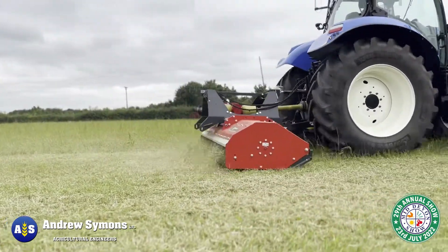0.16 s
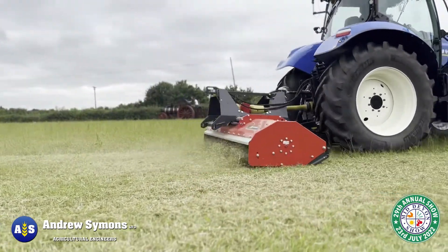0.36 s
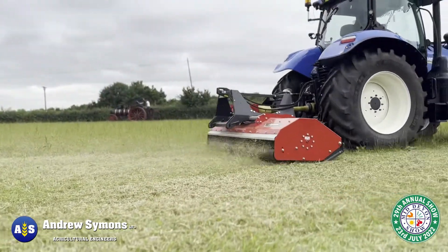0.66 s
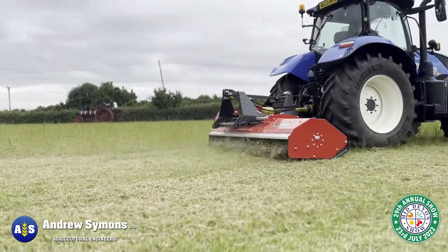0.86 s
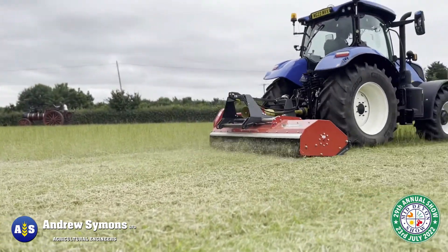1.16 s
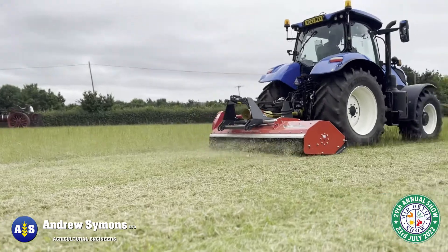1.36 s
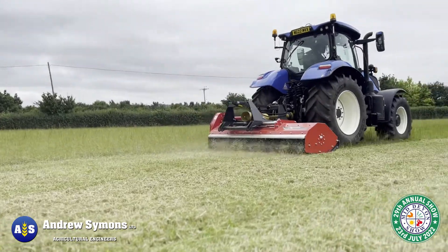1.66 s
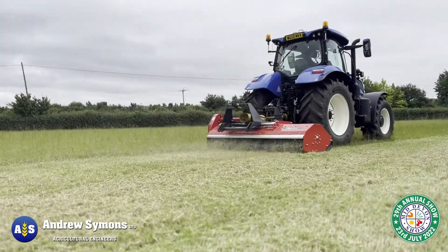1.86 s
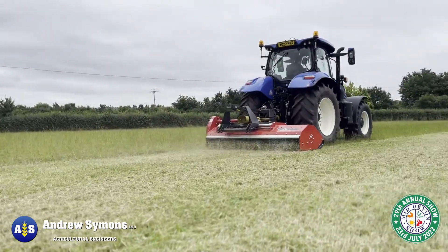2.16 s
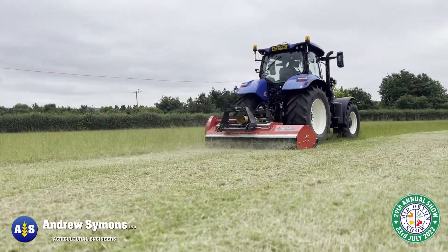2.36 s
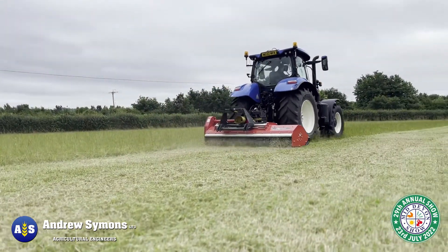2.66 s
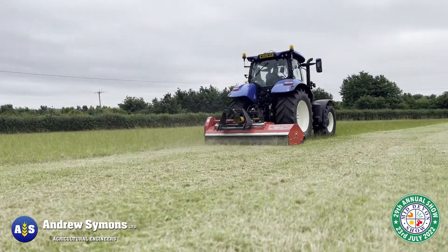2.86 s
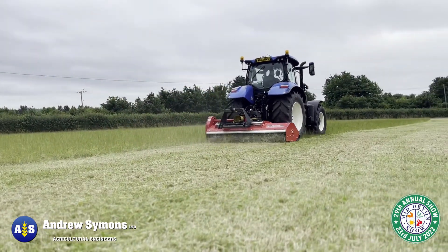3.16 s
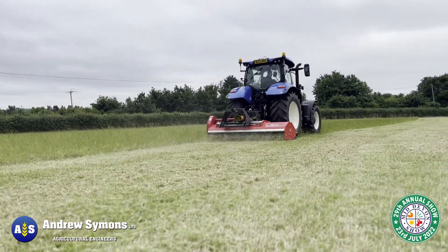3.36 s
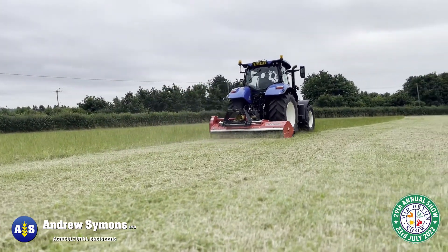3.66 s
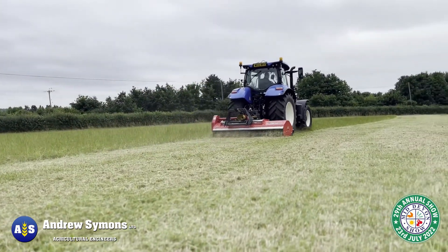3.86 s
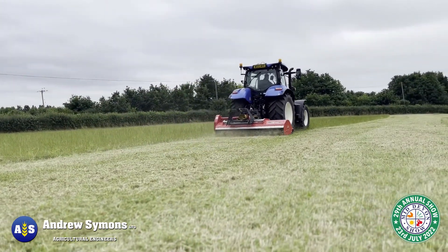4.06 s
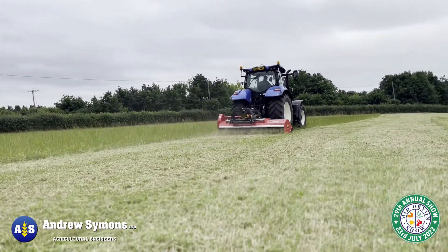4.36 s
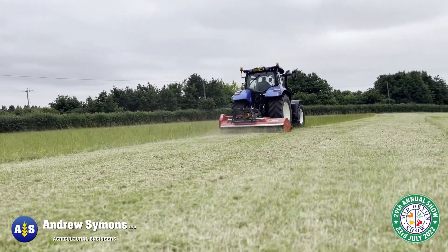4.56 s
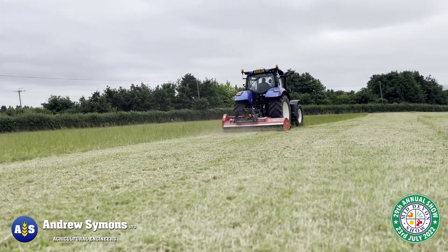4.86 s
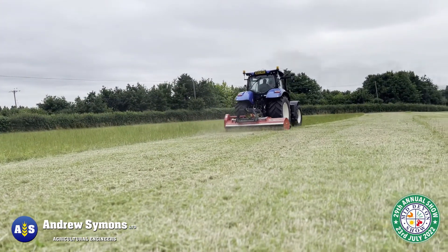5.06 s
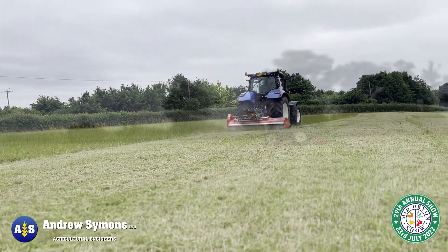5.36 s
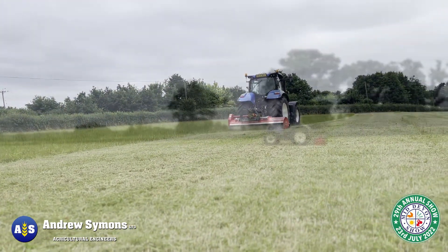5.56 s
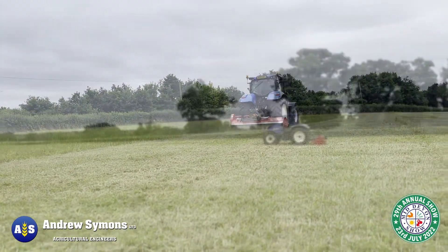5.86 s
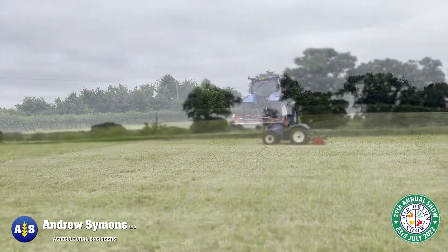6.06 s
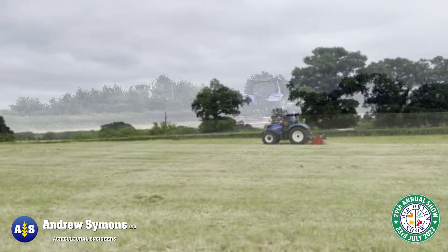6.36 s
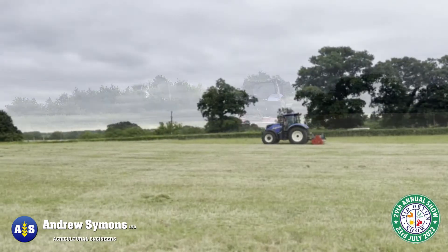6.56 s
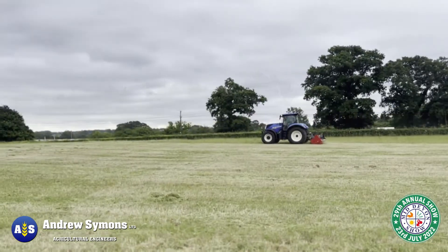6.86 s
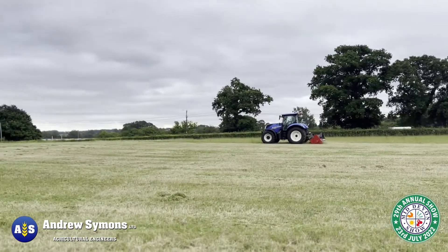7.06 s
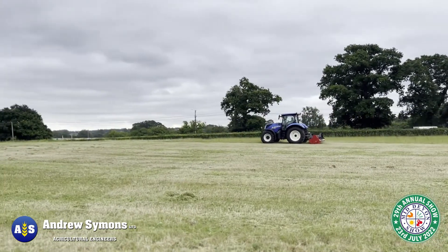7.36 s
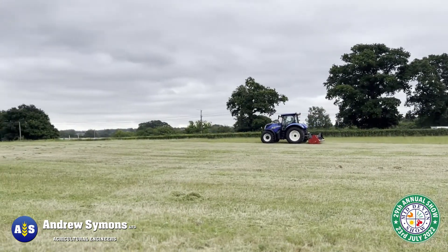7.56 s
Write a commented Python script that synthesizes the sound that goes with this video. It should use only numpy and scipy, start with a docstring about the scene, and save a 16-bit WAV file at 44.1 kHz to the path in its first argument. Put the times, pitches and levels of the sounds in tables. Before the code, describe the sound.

Outdoors in an open field, a tractor with a flail mower starts close to a phone microphone: low engine roar, steady rotor hum, bright hissing of shredded grass, knocking clatter and faint gear whine. A sharp burst of debris rattles on the steel hood just after one second. The machine draws away, wind thumps on the microphone from three seconds, and the sound crossfades into a faint, duller far-off drone with thin gear tones.

```python
"""A flail mower towed by a diesel tractor draws away over an open field, heard by a two-port phone.
The rotor hum and gear whine are wavering sines; the grass hiss, clatter and low boom are coloured noise.
Stalks and clods on the steel hood are bursts of grit noise filtered by its modes.
Wind buffets are falling flutters with low thuds. A far pass, tones and noise with a ground echo, fades in."""
import sys
import numpy as np
from scipy import signal
from scipy.fft import rfft, irfft, next_fast_len
from scipy.io import wavfile
from scipy.ndimage import uniform_filter1d

SR = 44100
rng = np.random.default_rng(int(sys.argv[2]) if len(sys.argv) > 2 else 0)


def store_wav(level_fs):
    """Save 16-bit WAV to argv[1]."""
    pcm = np.round(np.clip(np.atleast_2d(level_fs), -1, 1) * 32767)
    wavfile.write(sys.argv[1], SR, pcm.T.astype(np.int16))


N = 340432
T = np.arange(N) / SR  # s
M = next_fast_len(N)  # transform length
F = np.maximum(np.arange(M // 2 + 1) * SR / M, 1)  # Hz, kept above 0

# wind eddies bursting on the phone: [t/s, flutter peak level/dB, flutter f/Hz, thud peak level/dB]
EDDIES = [(3.11, -18.5, 328, -12), (3.21, -26, 306, -26), (3.353, -40, 290, -18), (3.378, -37, 292, -11),
          (3.758, -34, 399, -13), (3.88, -34, 374, -23), (3.99, -30, 332, -32), (4.08, -37, 399, -30),
          (4.145, -31.5, 451, -25), (4.301, -24.5, 360, -13), (4.325, -31, 419, -30),
          (4.635, -34, 374, -30), (4.79, -32, 403, -30), (4.898, -32, 403, -30), (5.385, -34, 332, -22),
          (5.41, -23, 339.5, -28), (5.424, -25.5, 398, -23), (5.471, -26, 198, -40), (5.625, -41, 194, -20),
          (5.719, -38, 303, -14), (5.9, -40, 600, -32), (5.914, -31.5, 398, -25),
          (5.983, -18.5, 231.5, -19), (6.075, -34, 397, -23), (6.379, -29, 459, -18), (6.6, -30, 308, -41),
          (6.7, -41, 395, -16.5)]
BUFFET_S = 0.0084  # time unit of a buffet


def rotor():
    """Periodic passage: rows of flails pass the hood edge at a steady rate and sound its frequency."""
    # the hum swells as the open back of the hood turns to the phone, then fades: [t/s, level/dB]
    hum_rows = [(0.0, -25), (0.43, -32), (0.7, -27), (1.1, -20.5), (1.35, -20.5), (1.7, -16), (3.0, -18),
                (4.4, -18), (4.65, -22.5), (5.14, -18.5), (5.5, -25.5), (5.75, -23), (6.6, -33.5),
                (6.9, -31), (7.16, -41), (7.42, -35.5), (7.72, -32)]
    hum_db, = curve(hum_rows)
    hz = 128.6 + 0.13 * walk(4.1)
    phase = 2 * np.pi * np.cumsum(hz) / SR
    return direct(np.sqrt(2) * undb(hum_db) * np.sin(phase))


def grass():
    """Cavity resonance: broadband noise of shredded grass rings in the hood; the treble moves on its own."""
    # course of the hiss, before the hood rings: [t/s, level/dB, level above 7.2 kHz/dB]
    grass_rows = [(0.0, -26.5, -32), (0.32, -26.5, -30), (0.72, -25.5, -26.5), (0.9, -23.5, -29),
                  (1.1, -25, -25.5), (1.4, -25.5, -27), (1.72, -24, -25.5), (2.17, -27, -25),
                  (2.48, -29, -29), (2.86, -28, -29), (3.03, -27, -24.5), (3.27, -30.5, -32),
                  (3.75, -28.5, -28), (4.1, -30.5, -30.5), (4.4, -31, -34), (5.14, -31, -32.5),
                  (5.59, -35, -35.5), (6.0, -39.5, -41), (6.45, -41.5, -45.5), (6.65, -47.5, -52.5),
                  (7.25, -46, -54.5), (7.42, -41, -47), (7.72, -42.5, -45)]
    # spectrum of the shredding: [f/Hz, density/dB per Hz]
    hiss_colour = [(1200, -7), (2000, -4.5), (2900, -1), (3700, -1.5), (4900, -6.5), (6500, -1), (8500, -3),
                   (12500, -1), (16000, -4)]
    # resonances of the hood cavity: [f/Hz, width/Hz, level/dB]
    cavity = [(1970, 950, -6), (2340, 47, -7), (2810, 43, 3), (3590, 36, -4), (4120, 220, -3),
              (4650, 68, 0.5), (5020, 100, -1.5)]
    # thick tufts lift the hiss for a moment: [t/s, lift/dB, decay/s]
    tufts = [(0.09, 5, 0.033), (1.04, 3, .03), (1.2, 4.5, 0.074), (1.99, 5.5, 0.065), (2.06, 2, 0.073),
             (2.21, 3, .06), (2.485, 6.5, 0.044), (3.55, 2.5, 0.023), (3.65, 4.5, 0.025), (4.13, 4, 0.034),
             (4.56, 2, 0.041), (5.0, 2.5, 0.026), (5.19, 4, 0.056)]
    # a narrow dip climbs as the machine draws away: [t/s, f/Hz]
    dip_rows = [(0.0, 2760), (2.0, 2820), (5.0, 3130), (7.72, 3300)]

    hiss_db, treble_db = curve(grass_rows)
    hiss_db = hiss_db + bumps(tufts, attack=0.0089)
    shredding = rush(hiss_colour, swell_db=-0.06, flicker_db=1.2, rate=12, grain_db=0.77)
    hiss = shredding
    for mode in cavity:
        flicker = undb(1.8 * walk(14))  # each band rings unevenly
        hiss = hiss + flicker * shaped(shredding, np.abs(resonances([mode])))
    low, high = split(hiss, hz=7200)

    dip_hz, = curve(dip_rows)
    low = dip(low, dip_hz, half_width_hz=100, depth=0.55)
    # a broad band is dull at the start and opens up within a second
    shade_ends_s = 1
    shade = 0.53 * np.clip(1 - (T / shade_ends_s) ** 2, 0, 1)
    low = dip(low, 5160, half_width_hz=560, depth=shade)

    # the hiss gains its ground echo
    far = ramp(from_s=5.7, takes_s=1.3)
    low = (1 - far) * low + far * ground(low)
    return undb(hiss_db) * low + undb(treble_db) * high


def near_pass():
    """Gear meshing and impacts: whines over the noise of many knocks, which yields to the far pass."""
    # course of the clatter: [t/s, level/dB, gain of the part under 725 Hz/dB]
    clatter_rows = [(0.0, -30, 6), (0.06, -30, 5), (0.13, -24.5, 7), (0.2, -28.5, 1.5), (0.4, -30, 4.5),
                    (0.96, -31.5, 2.5), (1.32, -29, 4.5), (1.6, -32.5, 3.5), (2.3, -33, 2),
                    (4.4, -37, -1.5), (5.16, -39, -2), (5.6, -38, -4), (6.4, -46, -6)]
    # spectrum of the clatter: [f/Hz, density/dB per Hz]
    clatter_colour = [(300, -18), (550, 0), (780, -2.5), (1050, 2), (1500, -0.5), (2100, -1.5), (3000, -21),
                      (5000, -39)]
    # gear tones come and go as the machine turns its back:
    # [f/Hz, level/dB, pitch wander/Hz, loudest at t/s, lasting/s]
    near_gears = [(1032, -42, 7, .4, .5), (1367, -43.5, 6, .8, 1.0), (1852, -41, 5, .5, .8),
                  (1846, -50, 3, 4.3, 1.1), (2062, -46, 5, 2.8, .25), (3640, -52, 40, .25, .4),
                  (2052, -49, 3, 4.6, .7), (1287, -53, 8, 3.2, .7)]

    clatter_db, lower_db = curve(clatter_rows)
    clatter = rush(clatter_colour, swell_db=0.5, flicker_db=2.0, rate=7, grain_db=1.0)
    low, high = split(clatter, hz=725)
    # grass soaks up the lower part first as the machine draws away
    clatter = undb(clatter_db) * (high + undb(lower_db) * low)
    fade_s, silent_at_s = 1.23, 6.52
    fade = np.clip((silent_at_s - T) / fade_s, 0, 1)
    return fade * clatter + whines(near_gears, waver_db=2.2, sag=0)


def clacks():
    """Modal excitation: short rattles of grit ring the damped hood, most near the panel struck."""
    # stalks and clods on the hood: [t/s, level before the envelope/dB, panel struck f/Hz]
    strikes = [(0.078, -28, 870), (0.1, -25, 1800), (0.128, -20, 1250), (0.142, -21, 1300),
               (0.188, -24, 2290), (0.269, -24, 1030), (0.387, -18.5, 1850), (0.72, -24, 2190),
               (0.856, -24, 4130), (0.999, -20, 1210), (1.04, -22, 970), (1.196, -15, 2500),
               (1.2, -17, 2300), (1.203, -20, 4300), (1.207, -19, 3800), (1.213, -14, 1600),
               (1.217, -14.5, 1630), (1.22, -18, 3600), (1.226, -11, 1260), (1.236, -21, 3500),
               (1.238, -18, 1200), (1.244, -26, 3700), (1.251, -24, 3800), (1.336, -22, 1040),
               (1.493, -22, 964), (1.997, -31, 2400), (2.474, -35, 3630), (3.657, -35, 2320),
               (4.117, -32, 2200), (4.48, -32, 2300), (4.7, -31, 2100), (5.069, -35, 2200),
               (5.183, -27, 2200), (7.565, -32, 2200)]
    # modes of the hood: [f/Hz, width/Hz, level/dB]
    hood_modes = [(1010, 300, 1), (1300, 140, 3.5), (1670, 65, 3.5), (2340, 240, 0.5), (3070, 200, -7),
                  (2900, 180, -5), (3920, 550, -12)]
    attack_s, decay_s = 0.00049, 0.0073
    reach_octaves = 0.4  # how far round the struck panel the hood rings

    size = SR // 8
    t = np.arange(size) / SR
    f = np.maximum(np.arange(size // 2 + 1) * SR / size, 1)
    hood = np.interp(f, F, np.abs(resonances(hood_modes)))
    envelope = np.minimum(t / attack_s, 1) * np.exp(-t / decay_s)
    out = np.zeros((2, N))
    for s, db, hz in strikes:
        grain_levels = rng.exponential(size=size // 16 + 1).repeat(16)[:size]
        grit = rng.standard_normal((2, size)) * undb(4.0 * grain_levels)
        panel = 1 / (1 + (np.log2(f / hz) / reach_octaves) ** 2)
        ring = irfft(rfft(grit) * hood * panel, size)
        i = int(s * SR)
        out[:, i:i + size] += undb(db) * unit(ring) * envelope
    return out


def boom():
    """Low-frequency radiation: engine and hood panels roar as noise, with breeze rumble beneath."""
    # [t/s, level of engine and hood/dB, level of breeze rumble/dB, gain of panels above 262 Hz/dB]
    boom_rows = [(0.0, -22.5, -20.5, 7), (0.5, -22, -28, 1), (1.35, -26.5, -26, 8), (2.15, -25, -31, 3.5),
                 (2.6, -29, -26.5, 6), (2.99, -26, -30.5, 3), (3.2, -20, -21.5, -2),
                 (3.57, -27, -27.5, 4.5), (3.87, -24.5, -27, 2), (4.25, -24.5, -26, -0.5),
                 (4.54, -26.5, -22.5, -1.5), (5.0, -27.5, -26.5, 2), (5.5, -30, -31, -2.5),
                 (5.95, -31, -27, 0), (6.4, -33, -30, -0.5), (7.72, -35.5, -28.5, -7)]
    # spectrum of roar and rumble: [f/Hz, density/dB per Hz]
    boom_colour = [(25, -15), (40, -7.5), (55, 5), (90, 6), (160, 0.5), (250, -4), (330, -9), (390, -15),
                   (450, -24), (520, -33), (700, -55)]
    gust_lift_db, gust_s = 4.5, 0.012

    boom_db, breeze_db, panel_db = curve(boom_rows)
    # the roar swells round each buffet
    gusts = [(row[0] + BUFFET_S, gust_lift_db, gust_s) for row in EDDIES]
    boom_db = boom_db + bumps(gusts, attack=gust_s)
    noise = rush(boom_colour, swell_db=0.32, flicker_db=1.0, rate=8, grain_db=1.0)
    breeze, roar = split(noise, hz=119.3)
    engine, panels = split(roar, hz=262)
    machine = (engine + undb(panel_db) * panels) / np.std(roar)
    return undb(boom_db) * machine + undb(breeze_db) * unit(breeze)


def buffets():
    """Turbulent pressure: eddies burst on the phone as a rough flutter falling in pitch, then a low thud."""
    thud_hz, rough_rad = 93.5, 1.1
    peak, fall = 0.7, 6  # flutter peak and time constant of its falling pitch, in buffet units
    out = np.zeros(N)
    for s, db, hz, thud_db in EDDIES:
        turn = rng.random()
        t = np.clip((T - s) / BUFFET_S, -4, 9)
        # cycles whose rate passes hz at the flutter's peak
        glide = -hz * BUFFET_S * fall * np.exp((peak - t) / fall)
        flutter = np.sin(2 * np.pi * (turn + glide) + rough_rad * walk(300))
        flutter = np.exp(-.5 * (t - peak) ** 2) * flutter
        thud = np.exp(-.5 * (t - 2) ** 2) * np.sin(2 * np.pi * (turn + thud_hz * (T - s)))
        out += undb(db) * flutter + undb(thud_db) * thud
    return direct(out)


def far_pass():
    """Interference of direct and reflected sound: the machine far off, a duller drone with gear tones."""
    # course of the drone before its echo: [t/s, level/dB]
    far_rows = [(5.6, -47), (6.1, -40.5), (6.5, -39.5), (6.9, -37.5), (7.3, -37.5), (7.72, -35.5)]
    # spectrum of the drone: [f/Hz, density/dB per Hz]
    far_colour = [(400, -5.5), (750, 1.5), (930, -4), (1150, 1.5), (1600, 2.5), (2050, 3.5), (2500, -2),
                  (2750, -7), (3300, -10), (3700, -14), (5000, -16), (6500, -38)]
    # tones: [f/Hz, level/dB, pitch wander/Hz, loudest at t/s, lasting/s]
    far_gears = [(52, -30, 1, 7.15, .35), (1136, -55, 8, 7.1, .6), (1227, -55, 8, 7.1, .6),
                 (1423, -48, 2, 6.95, .45), (1452, -47.5, 6, 7.15, .4), (1645, -41, .3, 6.75, .2),
                 (1635, -39.5, .3, 7.27, .2), (1852, -47, 2, 7.55, .25), (1954, -57, 6, 6.9, .4),
                 (2037, -43, 2, 7.0, .45)]

    far_db, = curve(far_rows)
    drone = rush(far_colour, swell_db=-0.26, flicker_db=1.5, rate=11, grain_db=-0.5)
    started = T > far_rows[0][0]
    # the tones sink as the machine crosses
    tones = whines(far_gears, waver_db=1.2, sag=-.009)
    return started * undb(far_db) * ground(drone) + tones


def whines(lines, waver_db, sag):
    """Gear-mesh tones: sines of wavering level whose pitch wanders and shifts by the share sag a second."""
    out = np.zeros(N)
    for hz, db, wander_hz, s, lasting in lines:
        level = undb(db + waver_db * walk(2.9))
        envelope = np.exp(-.5 * ((T - s) / lasting) ** 4)
        pitch = hz * (1 + sag * (T - s)) + wander_hz * walk(2 + wander_hz)
        out += np.sqrt(2) * level * envelope * np.sin(2 * np.pi * np.cumsum(pitch) / SR)
    return direct(out)


def rush(colour, swell_db, flicker_db, rate, grain_db):
    """Band-filtered noise: third-octave bands swell together and flicker alone; rows: direct, scattered."""
    hz, db = np.transpose(colour)
    octave, corners = np.log2(F), np.log2(hz)
    grain_levels = rng.exponential(size=M // 64 + 1).repeat(64)[:M]
    grains = rng.standard_normal((2, M)) * undb(grain_db * grain_levels)
    noise = rfft(grains) * undb(np.interp(octave, corners, db, left=-90, right=-90))
    swell, out = walk(rate), 0
    for centre in np.arange(corners[0], corners[-1] + 1 / 3, 1 / 3):
        # neighbouring bands overlap and add up to one
        band = np.cos(np.pi * np.clip(1.5 * (octave - centre), -.5, .5)) ** 2
        level = undb(swell_db * swell + flicker_db * walk(2 * rate))
        out = out + irfft(noise * band, M)[:, :N] * level
    return unit(out)


def ground(x):
    """Specular reflection: a delayed echo from the ground, clean only in a middle range of frequencies."""
    delay_s, strength = .00166, .8
    middle = 1 / (1 + (3000 / F) ** 6) / (1 + (F / 5200) ** 12)
    return shaped(x, 1 + strength * middle * np.exp(-2j * np.pi * F * delay_s))


def resonances(modes):
    """Modal superposition: summed complex response of a few damped modes."""
    return sum(undb(db) / (1 + 1j * (F - hz ** 2 / F) / width) for hz, width, db in modes)


def dip(x, hz, half_width_hz, depth):
    """Heterodyne notch: shift a band to zero, smooth it, shift it back and subtract a share of it."""
    turn = np.exp(2j * np.pi * np.cumsum(hz + 0 * T) / SR)
    pole = np.exp(-2 * np.pi * half_width_hz / SR)
    band = signal.lfilter([1 - pole], [1, -pole], x / turn) * turn
    return x - 2 * depth * np.real(band)


def split(x, hz):
    """Complementary filtering: the parts below and above a frequency, which add up to the whole."""
    top = 1 / (1 + (hz / F) ** 6)
    return shaped(x, 1 - top), shaped(x, top)


def shaped(x, response):
    """Linear filtering: multiply the spectrum of both rows by a response."""
    return irfft(rfft(x, M) * response, M)[:, :N]


def direct(x):
    """Point source: all of the sound is direct, none scattered."""
    return np.array([x, 0 * x])


def bumps(rows, attack):
    """Transient envelope: brief rises with a Gaussian attack and exponential decay, summed."""
    out = 0
    for s, lift, release in rows:
        out = out + lift * np.exp(-np.where(T < s, ((s - T) / attack) ** 2, (T - s) / release))
    return out


def ramp(from_s, takes_s):
    """Linear crossfade: a rise from 0 to 1."""
    return np.clip((T - from_s) / takes_s, 0, 1)


def walk(rate):
    """Smoothed random process: levels held about 1 / rate s, slewed twice; rms 1."""
    k = int(SR / rate)
    steps = np.repeat(rng.standard_normal(N // k + 1), k)
    return unit(uniform_filter1d(uniform_filter1d(steps, k), k)[:N])


def curve(rows):
    """Linear interpolation: the columns of a table as straight lines in time."""
    s, *columns = np.transpose(rows)
    return [np.interp(T, s, c) for c in columns]


def unit(x):
    """Normalisation: scale to rms 1."""
    return x / np.sqrt(np.mean(x ** 2))


def undb(db):
    """Level to amplitude: dB to gain."""
    return 10 ** (np.asarray(db) / 20)


def ports(sound, table):
    """Spatial coherence: direct and scattered sound give the ports their likeness, balance and lag."""
    hz, *columns = np.transpose(table)
    like, pan_db, lead = (np.interp(F, hz, c) for c in columns)
    like = np.clip(like, 0, 1)
    same, other = rfft(sound, M)
    same = same * np.sqrt((1 + like) / 2)
    other = other * np.sqrt((1 - like) / 2)
    left = (same + other) * undb(pan_db / 2)
    right = (same - other) * undb(-pan_db / 2) * np.exp(-1j * lead)
    return irfft(np.array([left, right]), M)[:, :N]


def scene():
    """Superposition: the near view fades into the far one, the machine at another angle to the phone."""
    # the two ports: [f/Hz, likeness/0-1, left minus right level/dB, left phase lead/rad]
    near_ports = [(30, .97, -.4, 0), (130, .985, -1.1, 0), (350, .93, -2.6, .2), (700, .75, 1.5, .2),
                  (1300, .5, 4.5, -.8), (1600, .45, 2.5, -2), (2100, .9, .5, 0), (2900, .5, .5, .7),
                  (4000, .92, 1, 0), (5000, .45, 1, .3), (6500, .65, .5, -1.2), (8400, .93, 0, -3.14),
                  (9500, .7, 0, -4.1), (10800, .74, 0, -5.4), (11700, .97, 0, -6.28), (13300, .75, 0, -7.4),
                  (15400, .93, 0, -9.42)]
    # the two ports as they hear the far pass, from another side: same columns
    far_ports = [(30, .98, 0, 0), (350, .95, -1, .2), (520, .7, -.5, .6), (700, .72, -2, .4),
                 (930, .3, 2, 1.3), (1100, .7, 3, 0), (1400, .7, 3.5, -.9), (1640, .7, -1.5, .9),
                 (1850, .85, 4.5, 0), (2030, .55, 1, 2), (2250, .65, 3.5, .4), (2500, .75, 1, .8),
                 (2800, .5, 3, 3), (3150, .72, 5, 3.4), (3400, .4, 1, 4.2), (3650, .88, 1, 4.3),
                 (3950, .45, 0, 5.5), (4200, .9, 0, 5.9), (4500, .45, -3, 6.7), (4750, .83, -3, 6.8),
                 (5200, .4, 0, 4.3), (5700, .58, -.5, 5.4), (6400, .3, -2, 5.9), (7000, .35, 1.5, 3.6),
                 (7800, .95, 0, 3.14), (10000, .55, 0, 1.7), (11700, .95, 0, 0), (14000, .45, 0, -1.9),
                 (15400, .9, 0, -3.14)]
    both = rotor() + grass() + near_pass() + clacks() + boom() + buffets()
    far = ramp(from_s=6.1, takes_s=.6)
    return ports((1 - far) * both, near_ports) + ports(far * both + far_pass(), far_ports)


def record(dry):
    """Band limitation: the phone cuts the top steeply, by an elliptic low-pass."""
    top_hz, ripple_db, stop_db = 15450, .2, 80
    low_pass = signal.ellip(14, ripple_db, stop_db, top_hz, fs=SR, output="sos")
    return signal.sosfilt(low_pass, dry)


dry = scene()
out = record(dry)
store_wav(out)
```